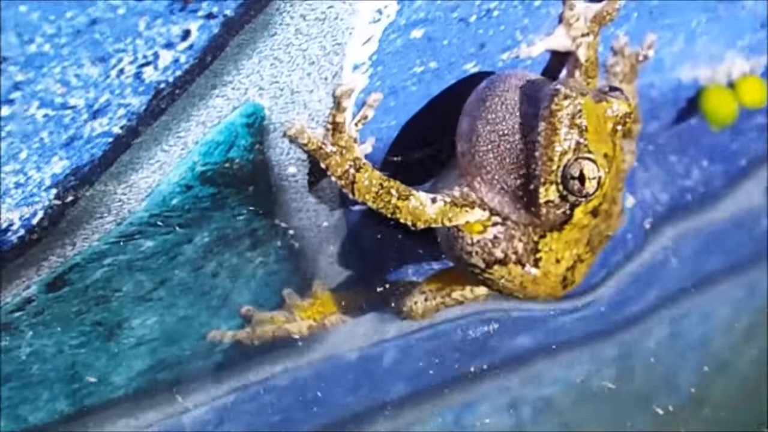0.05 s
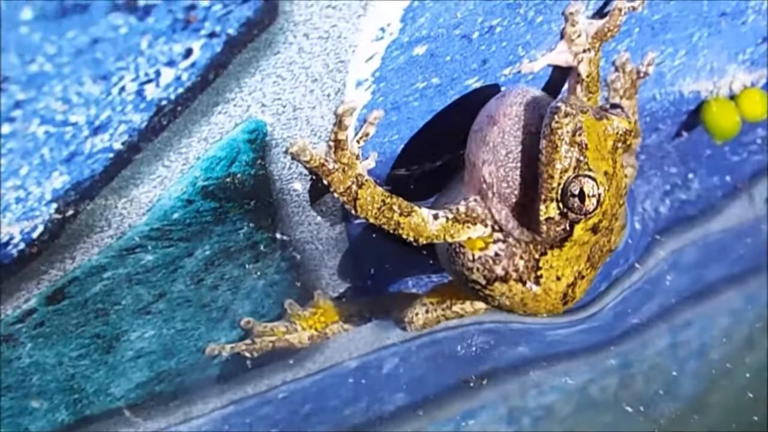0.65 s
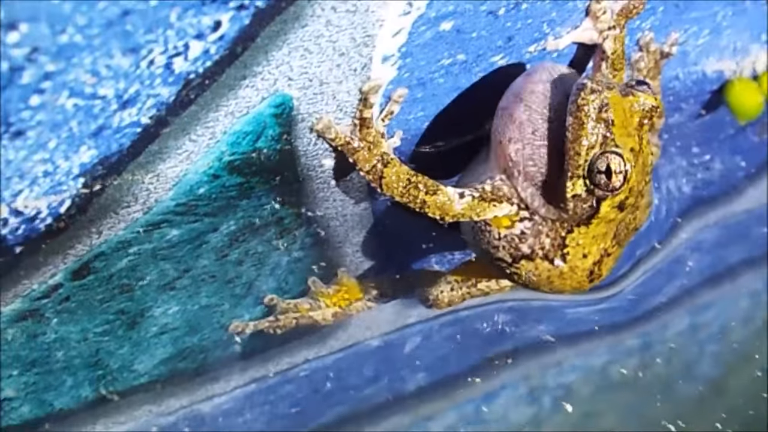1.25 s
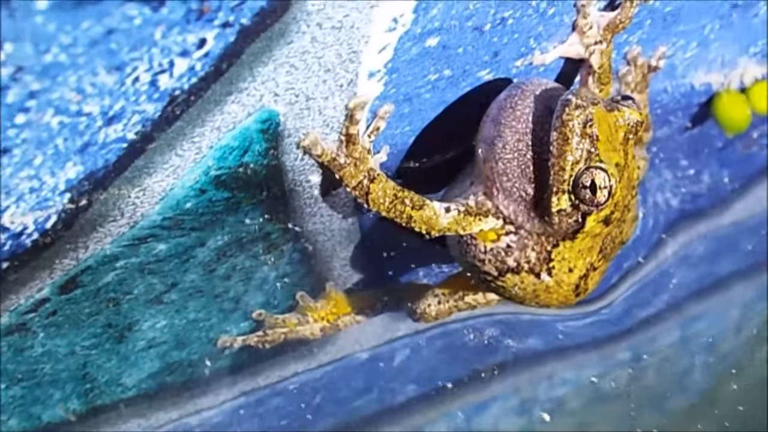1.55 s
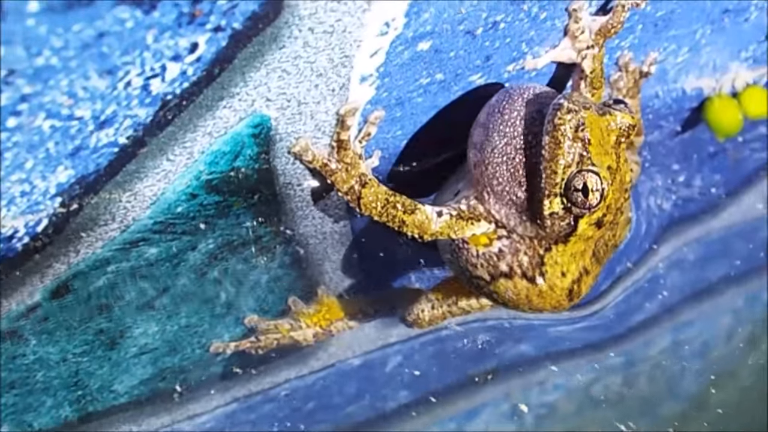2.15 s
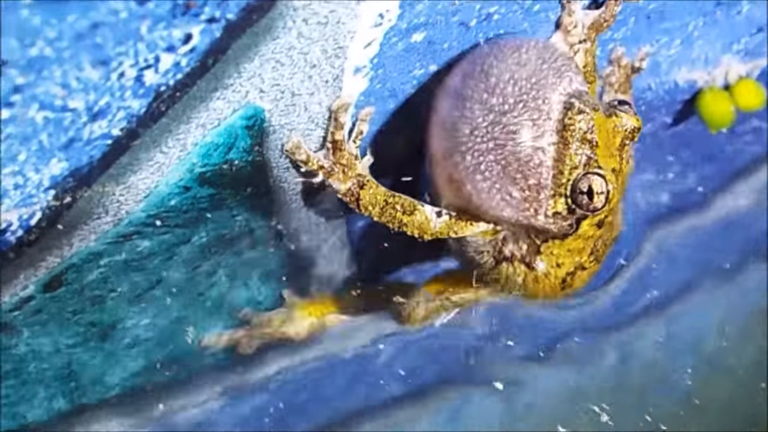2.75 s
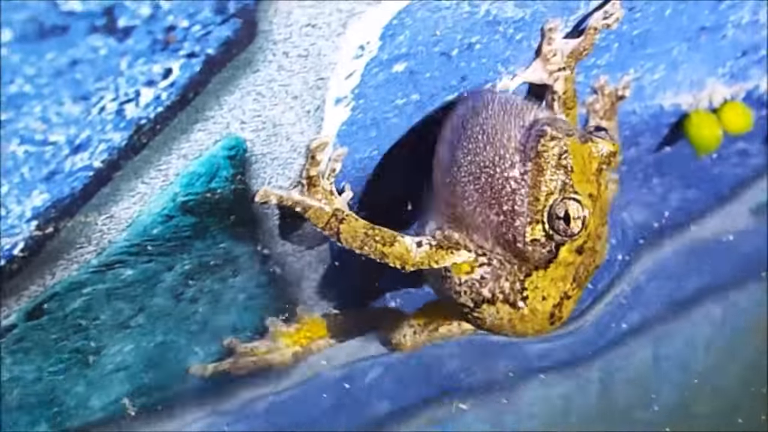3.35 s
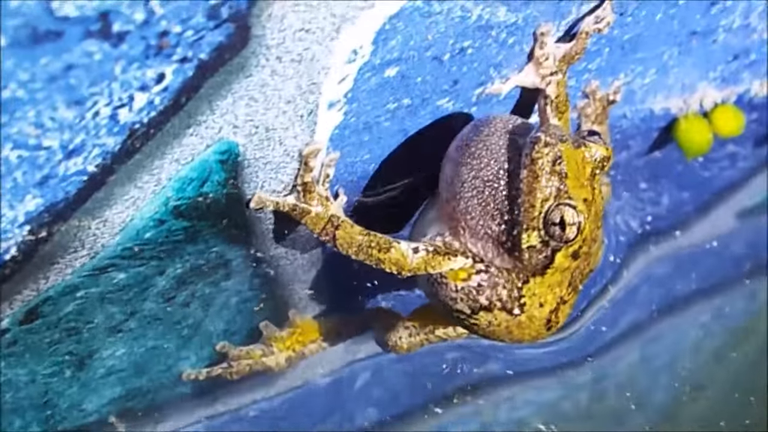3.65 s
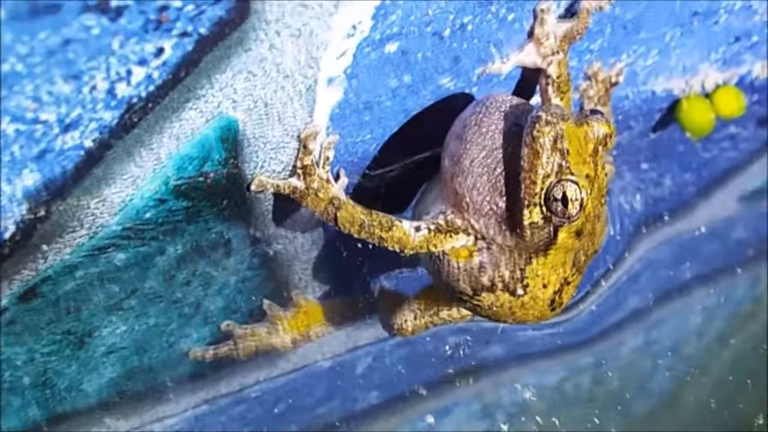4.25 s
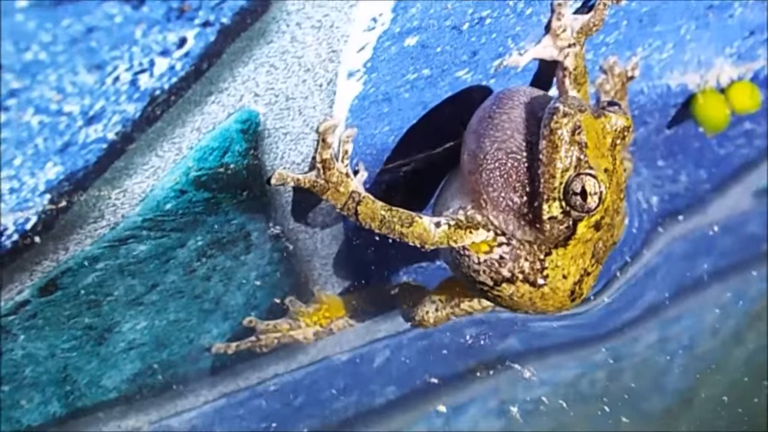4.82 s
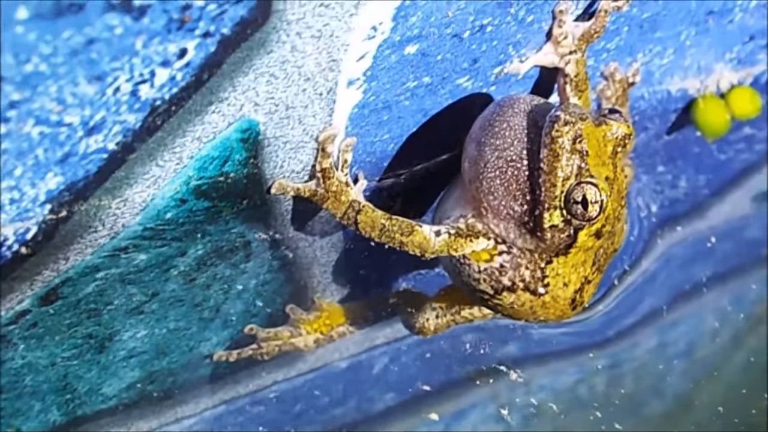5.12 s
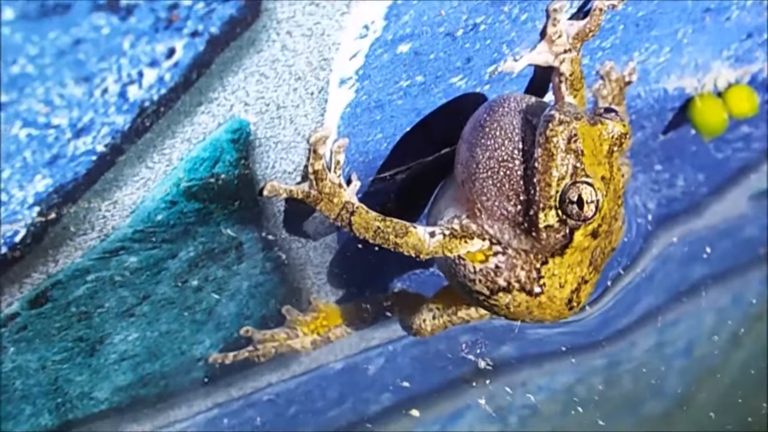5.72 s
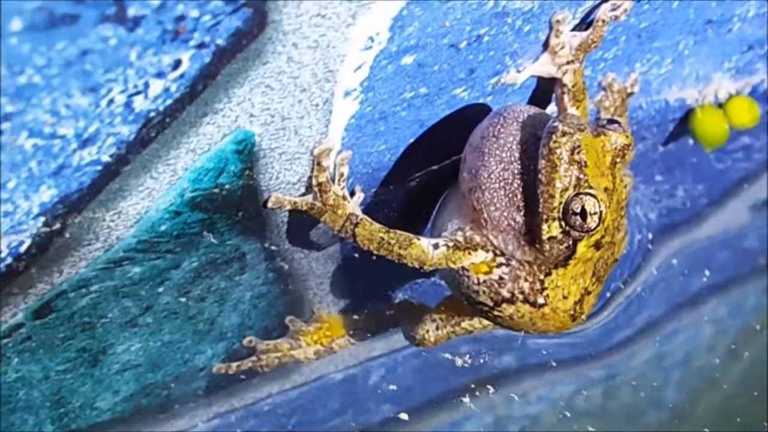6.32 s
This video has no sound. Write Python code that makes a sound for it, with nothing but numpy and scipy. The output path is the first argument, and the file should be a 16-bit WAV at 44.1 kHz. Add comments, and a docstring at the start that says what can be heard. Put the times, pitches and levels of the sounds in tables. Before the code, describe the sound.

Two tree frogs finish harsh, rapidly pulsing trills at the edge of an outdoor swimming pool. Small water drips and ticks fall in the quiet, and a distant frog calls faintly. Then a frog right at the microphone bursts into one loud, raspy trill. More drips follow, and near the end the first two frogs trill again, overlapping, with a slight echo over a soft hush.

```python
"""Two tree frogs finish their trills along the rim of a swimming pool, over a quiet outdoor hush.
Water drips and ticks, a far frog calls, faint whistles pass, and one frog trills right at the
microphone; near the end the first two call again. Each trill is a train of roughly 10 ms pulses:
the larynx glides upward through the resonances of throat and vocal sac, and the pool walls echo."""
import sys
import numpy as np
from scipy import signal
from scipy.fft import rfft, irfft, next_fast_len
from scipy.io import wavfile
from scipy.ndimage import uniform_filter1d, minimum_filter1d

SR = 44100
rng = np.random.default_rng(int(sys.argv[2]) if len(sys.argv) > 2 else 0)


def master(y):
    """Save y as 16-bit WAV."""
    cut = np.clip(np.atleast_2d(y).T, -1, 1)
    pcm = np.round(cut * 32767)  # scale
    wavfile.write(sys.argv[1], SR, pcm.astype(np.int16))


N = 281358
FFT_SIZE = next_fast_len(N + 2 * SR)
FREQ = np.maximum(np.arange(FFT_SIZE // 2 + 1) * SR / FFT_SIZE, 1)
TIME = np.arange(N) / SR


def from_db(db):
    """Decibels to gain."""
    return 10 ** (np.asarray(db) / 20)


def unit_rms(x):
    """Scale to rms 1."""
    return x / np.sqrt(np.mean(x ** 2) + 1e-20)


def curve(points):
    """Draw a curve over the spectrum through (Hz, value) points, along log frequency."""
    hz, values = np.transpose(points)
    return np.interp(np.log(FREQ), np.log(hz), values)


def filtered(x, response):
    """Pass a sound through a frequency response."""
    return irfft(rfft(x, FFT_SIZE) * response, FFT_SIZE)[..., :N]


def resonance(hz, width):
    """Response of one damped resonance, 1 at its peak."""
    return 1 / (1 + 1j * (FREQ / hz - hz / FREQ) * hz / width)


def add(track, s, sound):
    """Mix a short sound into a track at s seconds."""
    start = int(np.clip(round(s * SR), 0, N))
    track[start:start + len(sound)] += sound[:N - start]


def trill_pulses(trill, settle_s, first_db, first_share):
    """A trill opens with short pushes, settles and slows; gives seconds, dB and share of a full push."""
    start, end, per_s, slowing, level_db = trill
    along = np.linspace(0, 1, round((end - start) * per_s) + 1)
    s = start + (end - start) * along * (1 - slowing / 2 * (1 - along))
    opening = np.exp(-((s - start) / settle_s) ** 1.1)
    db = level_db + first_db * opening
    share = 1 - (1 - first_share) * opening
    # as the air runs out, the last pulse comes late and short
    s[-1] += .002
    share[-1] *= .98
    return np.column_stack([s, db, share])[s >= 0]


def larynx(trills, settle_s, first_db, first_share, start_hz, end_hz, length_s,
           attack_s, release_s, jitter, rasp_db, snap_db, overload_click_db):
    """Each push of air starts the cords on a rising glide; gives their tone and the air they chop."""
    tone, air, t = np.zeros(N), np.zeros(N), np.arange(SR // 50) / SR
    glide_hz = start_hz + (end_hz - start_hz) * t / length_s
    pulses = np.vstack([trill_pulses(trill, settle_s, first_db, first_share) for trill in trills])
    for s, level_db, share in pulses:
        # timing, pitch and level stray a little from pulse to pulse
        s += .00008 * rng.standard_normal()
        waver = uniform_filter1d(rng.standard_normal(len(t)), size=30)
        hz = glide_hz * (1 + jitter * waver + .012 * rng.standard_normal())
        phase = 2 * np.pi * np.cumsum(hz) / SR
        attack = np.sin(np.pi / 2 * np.clip(t / attack_s, 0, 1))
        release = np.sin(np.pi / 2 * np.clip((length_s * share - t) / release_s, 0, 1)) ** 2
        push = attack * release * from_db(level_db + .65 * rng.standard_normal())
        # short pushes barely close the cords and give weaker overtones
        overtones = share ** 2 * sum(np.cos(k * phase) / k for k in range(2, 9))
        add(tone, s, push * (np.cos(phase) + overtones))
        # the cords part with a snap, then chop the air once a cycle
        snap = from_db(level_db + snap_db) * np.exp(-t / .0018)
        add(air, s, (push * (1 + np.cos(phase)) + snap) * rng.standard_normal(len(t)))
        # a sharp click like a microphone overloading on each pulse's peak, now faint, now sharp
        add(air, s + .0024, from_db([level_db + overload_click_db + 5 * rng.standard_normal()]))
    return tone, from_db(rasp_db) * air


def radiate(voice, sac, echoes, level_db, smear_t60, smear_amount):
    """The sac radiates the tone, the rasp bypasses it, and both bounce off nearby walls."""
    # Colour of the rasping air. Each row: frequency in Hz, gain in dB.
    rasp_colour = [(50, -29.5), (200, -8.5), (600, 11), (1500, 2), (3000, -8.5), (5000, 0), (6000, -7),
                   (7000, -5.5), (9000, -15), (10500, -13.5), (13000, -17.5), (14500, -10.5),
                   (16000, -19.5)]
    # Scattering by the rough rim. Each row: frequency in Hz, share scattered at a smear_amount of 1.
    rim_scatter = [(1200, 0.052), (2500, 0.25), (4000, 0.72), (5500, 0.72), (7000, .8), (16000, 1)]
    tone, air = voice
    body = sum((-1) ** k * from_db(db) * resonance(hz, width) for k, (hz, width, db) in enumerate(sac))
    paths = 1 + sum(share * np.exp(-2j * np.pi * FREQ * ms / 1000) for ms, share in echoes)
    # short waves break up on the rough rim and reach each microphone by many paths
    t = np.arange(SR // 20) / SR
    smear = rng.standard_normal((2, len(t))) * from_db(-60 * t / smear_t60)
    smear = rfft(smear / np.sqrt(np.sum(smear ** 2, axis=1, keepdims=True)), FFT_SIZE)
    rough = np.clip(smear_amount * curve(rim_scatter), 0, 1)
    paths = paths * (np.sqrt(1 - rough ** 2) + rough * smear)
    rasp = filtered(air, from_db(curve(rasp_colour)) * paths)
    return from_db(level_db) * (filtered(tone, body * paths) + rasp)


def rim_frog():
    """A frog along the rim swells into each trill, its pulses smeared by the rough edge."""
    # Each row: first and last pulse in seconds, pulses per second, share of slowing, level in dB.
    trills = [(-.6045, .2810, 40.6, .068, 0.22), (5.0240, 5.9096, 40.6, .068, 0)]
    # Throat and sac resonances. Each row: centre in Hz, width in Hz, gain in dB.
    sac = [(1394, 180, -14), (2248, 140, -3), (2649, 79, -6), (2819, 50, -7.5), (3184, 100, -17.5),
           (3860, 130, -17.5), (5020, 176, -28), (6520, 220, -36.5), (8350, 1000, -30.5)]
    # Bounces off rim and water. Each row: delay in ms, share of the pressure.
    echoes = [(.96, 0.31), (3.45, 0.18), (3.73, 0.096), (5.19, 0.13), (7.32, 0.33), (16.82, .1),
              (22.5, 0.052)]
    voice = larynx(trills, settle_s=.045, first_db=-10.5, first_share=.74,
                   start_hz=1064.6, end_hz=1593, length_s=.0116, attack_s=.0014, release_s=.0048,
                   jitter=.1, rasp_db=-54.5, snap_db=-8.5, overload_click_db=16.5)
    return radiate(voice, sac, echoes, level_db=.05, smear_t60=.057, smear_amount=.9)


def answering_frog():
    """A second frog overlaps the rim frog with shorter, crisper pulses."""
    # Each row: first and last pulse in seconds, pulses per second, share of slowing, level in dB.
    trills = [(-.71, .0568, 39.1, .07, .5), (5.4427, 6.4006, 39.7, .018, 0.064)]
    # Throat and sac resonances. Each row: centre in Hz, width in Hz, gain in dB.
    sac = [(1309, 196, -12.5), (2310, 554, -9), (2738, 131, 1), (3890, 180, -9.5), (4994, 450, -19.5),
           (8640, 790, -31.5)]
    # Bounces off rim and water. Each row: delay in ms, share of the pressure.
    echoes = [(4.25, 0.17), (15.4, 0.13), (23.8, 0.06)]
    voice = larynx(trills, settle_s=.039, first_db=-3, first_share=.71,
                   start_hz=991, end_hz=1400, length_s=.0088, attack_s=.0017, release_s=.0015,
                   jitter=.1, rasp_db=-58.5, snap_db=-2.5, overload_click_db=10.5)
    return radiate(voice, sac, echoes, level_db=0, smear_t60=.003, smear_amount=.37)


def reverb(send, t60, onset_s, width):
    """Diffuse reflections build up and die away, nearly alike at both microphones."""
    # Colour of the tail. Each row: frequency in Hz, gain in dB.
    tail_colour = [(300, -8), (1100, -2.5), (1600, -3.5), (1950, 2.5), (2300, -3), (2700, 5.5), (3200, 2.5),
                   (4500, 1.5), (9000, -3), (16000, -17.5)]
    t = np.arange(SR) / SR
    build_up = 1 - np.exp(-(t / onset_s) ** 2)
    mid, side = rng.standard_normal((2, SR)) * from_db(-60 * t / t60) * build_up
    response = (mid + width * side * [[1], [-1]]) / np.sqrt(np.sum(mid ** 2))
    return filtered(send, rfft(response, FFT_SIZE) * from_db(curve(tail_colour)))


def night_air(hush_db=-57, insects_db=-79.5):
    """An even outdoor hush with the faint, steady ring of far insects."""
    # Colour of the hush. Each row: frequency in Hz, relative spectral level in dB.
    hush_colour = [(18, -52.5), (30, -29.5), (86, -9.5), (199, -6.5), (404, -9.5), (600, -3), (684, -2.5),
                   (889, -1), (1590, -6), (2230, -14), (3490, -17.5), (4190, -10), (5310, -21.5),
                   (13000, -22), (16000, -22.5)]
    # Stereo image of the hush. Each row: frequency in Hz, left-right likeness from 0 to 1.
    likeness = [(60, 1), (180, 0.94), (550, 1), (1650, 0.67), (4970, 0.59), (15000, 0.51)]
    alike = np.clip(curve(likeness), 0, 1)
    colour = from_db(curve(hush_colour)) * np.sqrt([1 + alike, 1 - alike])
    mid, side = filtered(rng.standard_normal((2, N)), colour)
    hush = mid + side * [[1], [-1]]
    insects = filtered(rng.standard_normal((2, N)), resonance(hz=4200, width=870))
    return from_db(hush_db) * unit_rms(hush) + from_db(insects_db) * unit_rms(insects)


def drips(tick_t60=.013, attack_s=.00022, low_cut_hz=490):
    """A drip is a sharp tick and a short hollow ring; so small a source radiates no bass."""
    # Each row: start in seconds, level in dB, pitch in Hz, tick offset in dB.
    drops = [(.935, -40, 1470, -20.5), (1.130, -47, 1350, -21), (1.5523, -30.5, 1590, -39),
             (2.1782, -23.5, 1670, 3), (2.302, -32, 1650, -24), (2.4915, -24.5, 1710, -28),
             (2.6385, -15.5, 1378, -26), (3.521, -34, 1480, -23), (3.6003, -35, 1438, -24),
             (3.676, -37.5, 1384, -21), (3.767, -39.5, 1410, -22), (3.9424, -27, 1470, -12.5),
             (3.9905, -35, 1430, -24.5), (4.0572, -27.5, 1480, -20.5), (4.2566, -29.5, 1590, -1),
             (4.2664, -11, 1550, -12), (5.308, -47, 1600, -24), (6.177, -17.5, 1720, -28)]
    # Ring of a drip. Each row: pitch ratio, level in dB, seconds to fall 60 dB.
    modes = [(.66, -7, 0.01), (.93, -6, 0.023), (1.08, -4.5, 0.016), (2.15, -23, 0.014), (3.2, -39, 0.0051)]
    # Colour of the tick. Each row: frequency in Hz, gain in dB.
    tick_colour = [(500, -20), (1500, -2), (2300, 6), (3200, 5.5), (4200, 2.5), (5000, -2.5), (6000, -7),
                   (9000, -9.5), (13000, -20), (16000, -33)]
    rings, ticks, t = np.zeros(N), np.zeros(N), np.arange(SR // 20) / SR
    for s, level_db, hz, tick_db in drops:
        ring = sum((-1) ** k * from_db(db - 60 * t / t60) * np.sin(2 * np.pi * hz * ratio * t)
                   for k, (ratio, db, t60) in enumerate(modes))
        add(rings, s, from_db(level_db) * ring * (1 - np.exp(-t / attack_s)))
        add(ticks, s, from_db(level_db + tick_db - 60 * t / tick_t60) * rng.standard_normal(len(t)))
    sound = rings + filtered(ticks, from_db(curve(tick_colour)))
    return signal.sosfilt(signal.butter(3, low_cut_hz, "high", fs=SR, output="sos"), sound)


def far_frog():
    """A distant frog gives one faint trill, its treble scattered on the way."""
    # Each row: first and last pulse in seconds, pulses per second, share of slowing, level in dB.
    trills = [(2.208, 2.659, 38, .03, 1.2)]
    # Throat and sac resonances. Each row: centre in Hz, width in Hz, gain in dB.
    sac = [(1415, 140, -34.5), (2860, 330, -27.5), (3320, 320, -28.5), (4220, 240, -34), (7180, 200, -48.5)]
    voice = larynx(trills, settle_s=.047, first_db=-13, first_share=.77,
                   start_hz=1188, end_hz=1620, length_s=.01, attack_s=.002, release_s=.003,
                   jitter=.09, rasp_db=-59.5, snap_db=-2.5, overload_click_db=12.5)
    return radiate(voice, sac, echoes=[], level_db=-1.5, smear_t60=.028, smear_amount=1.14)


def whistles():
    """Faint, thin, high glides fade in and out."""
    # One list per whistle. Each row: time in seconds, pitch in Hz, level in dB.
    glides = [
        [(2.35, 8900, -72), (2.39, 9150, -76), (2.47, 8950, -77), (2.52, 9800, -66), (2.56, 9000, -75)],
        [(2.52, 8400, -75), (2.56, 8000, -68), (2.60, 7400, -65)],
        [(4.92, 8200, -70), (4.96, 7750, -66), (5.0, 8050, -83), (5.02, 7650, -61.5), (5.04, 7500, -67)],
    ]
    out = np.zeros(N)
    for glide in glides:
        s, hz, db = np.transpose(glide)
        gate = uniform_filter1d(1.0 * ((TIME > s[0]) & (TIME < s[-1])), size=400)
        phase = 2 * np.pi * np.cumsum(np.interp(TIME, s, hz)) / SR
        out += gate * from_db(np.interp(TIME, s, db)) * np.sin(phase)
    return out


def sac_hoots():
    """As it fills before a trill, the sac sounds a soft tone with two overtones."""
    # Each row: peak in seconds, level in dB, pitch in Hz, half length in seconds, dB per overtone.
    hoots = [(2.5955, -16.5, 900, 0.0024, -9.5), (2.625, -21.5, 980, 0.0053, -28),
             (4.9798, -29.5, 1083, 0.003, -7), (5.008, -37, 1145, 0.0038, -10)]
    out = np.zeros(N)
    for s, db, hz, half_s, step_db in hoots:
        t = TIME - s
        tone = sum(from_db(db + k * step_db) * np.sin(2 * np.pi * (k + 1) * hz * t) for k in range(3))
        out += tone * np.exp(-np.minimum((t / half_s) ** 2, 60))
    return out


def near_frog():
    """The frog at the microphone bursts into a raspy trill with a short, hard first push."""
    # Each row: first and last pulse in seconds, pulses per second, share of slowing, level in dB.
    trills = [(2.6470, 3.2717, 41.6, .085, 0)]
    # Throat and sac resonances. Each row: centre in Hz, width in Hz, gain in dB.
    sac = [(1132, 153, -3.5), (1891, 153, 1), (2264, 155, 0), (3390, 220, -8), (4080, 355, -17),
           (4926, 140, -15), (6840, 240, -27), (8230, 230, -20.5)]
    # Bounces off rim and water. Each row: delay in ms, share of the pressure.
    echoes = [(5.15, .08), (16.9, .03), (21.19, .05)]
    voice = larynx(trills, settle_s=.019, first_db=7, first_share=.39,
                   start_hz=878, end_hz=1169, length_s=.0093, attack_s=.0016, release_s=.0024,
                   jitter=.12, rasp_db=-39.5, snap_db=2.5, overload_click_db=23.5)
    return radiate(voice, sac, echoes, level_db=-.4, smear_t60=.0085, smear_amount=.66)


def scene():
    """Four frogs and the drips; the further away, the more of the pool and yard is heard."""
    near, rim, answer, far = near_frog(), rim_frog(), answering_frog(), far_frog()
    water, hoots = drips(), sac_hoots()
    pool_send = (from_db(-48) * near + from_db(-17) * hoots + from_db(-10.5) * rim
                 + from_db(-18) * answer + from_db(-5.5) * far + from_db(-22.5) * water)
    yard_send = (from_db(-26) * near + from_db(-42) * water
                 + from_db(-25.5) * (rim + answer) + from_db(-12) * far)
    pool = reverb(pool_send, t60=.11, onset_s=.012, width=.17)
    yard = reverb(yard_send, t60=.96, onset_s=.02, width=.4)
    # the close frogs lean right, the drips left
    close = ((near + rim + hoots) * from_db([[-.95], [.85]]) + answer * from_db([[-.1], [.1]])
             + water * from_db([[1.2], [-1.2]]))
    return close + far + pool + yard + whistles() + night_air()


def limiter(x, ceiling, window=90):
    """The gain dips for a moment wherever a peak would pass the ceiling."""
    allowed = ceiling / np.maximum(np.abs(x).max(axis=0), ceiling)
    return x * uniform_filter1d(minimum_filter1d(allowed, window), window)


def record(dry):
    """The right microphone port rings in the treble; a fast limiter holds the peaks; the top is cut."""
    # Resonances of the right port. Each row: centre in Hz, width in Hz, gain in dB.
    port_modes = [(4900, 210, -6), (6640, 360, -4.5), (8900, 370, -7)]
    # Phase between the ports. Each row: frequency in Hz, lead of the left port in radians.
    port_phase = [(0, -0.3), (3620, -0.1), (4310, -1.2), (4740, -0.5), (6030, 0), (8010, 0.1), (8610, 0.9),
                  (9040, 0.6), (9650, -0.1), (16100, 0.0)]
    port_gain = np.abs(1 + sum(from_db(db) * resonance(hz, width) for hz, width, db in port_modes))
    lag = np.interp(FREQ, *np.transpose(port_phase))
    right = filtered(dry[1], port_gain * np.exp(-1j * lag))
    limited = limiter(np.array([dry[0], right]), ceiling=.71)
    return signal.sosfilt(signal.cheby2(14, 60, 17000, fs=SR, output="sos"), limited)


dry = scene()
out = record(dry)
master(out)
```